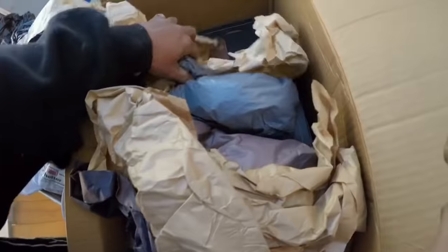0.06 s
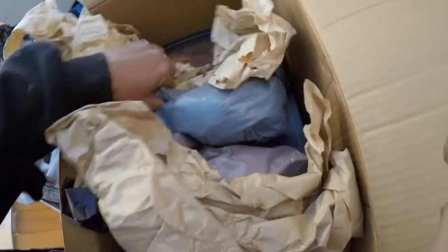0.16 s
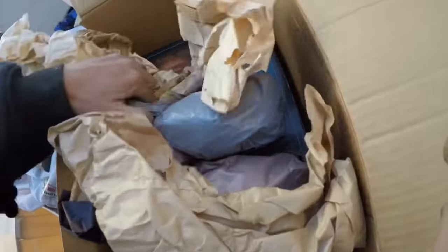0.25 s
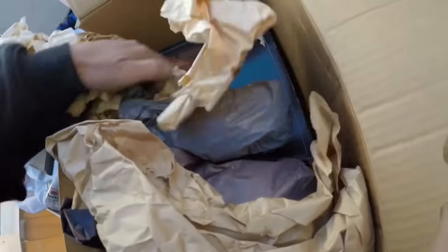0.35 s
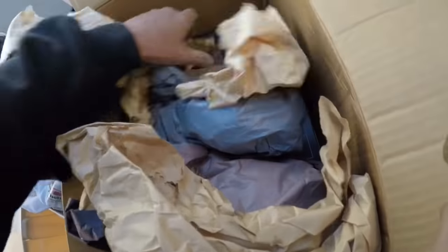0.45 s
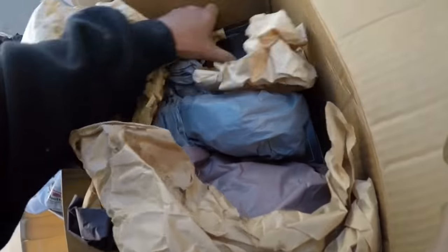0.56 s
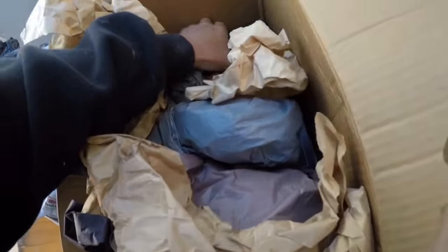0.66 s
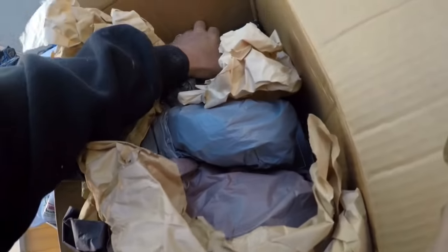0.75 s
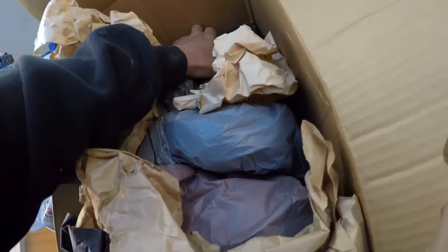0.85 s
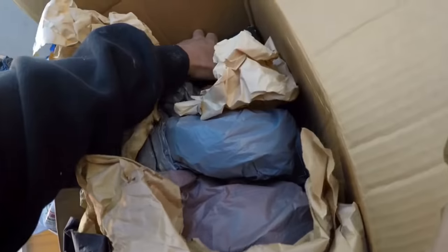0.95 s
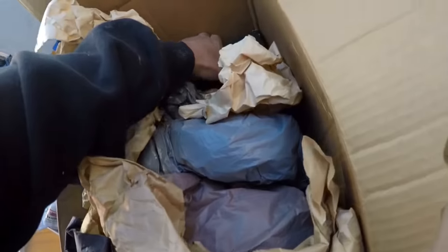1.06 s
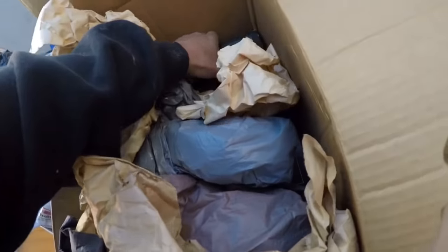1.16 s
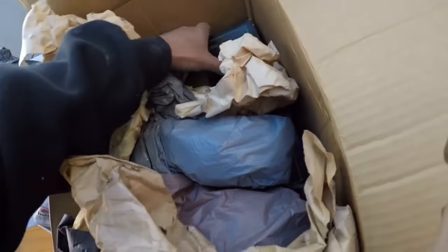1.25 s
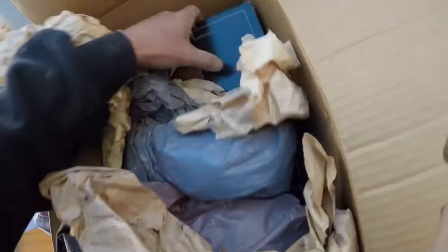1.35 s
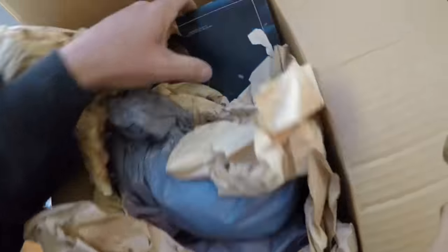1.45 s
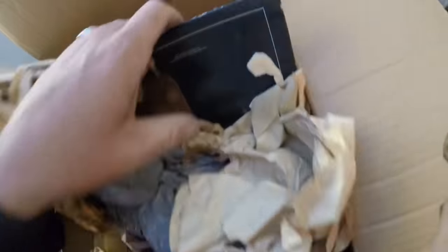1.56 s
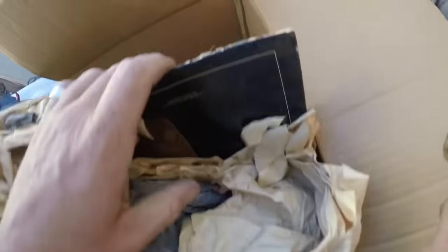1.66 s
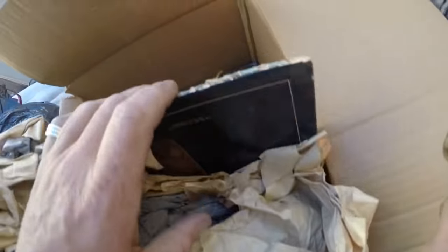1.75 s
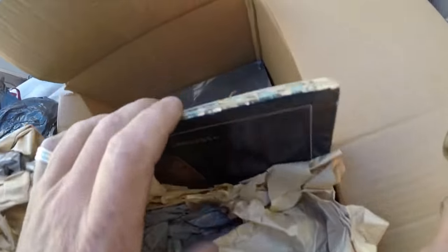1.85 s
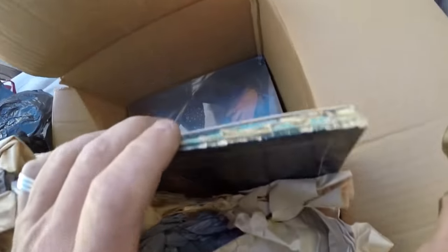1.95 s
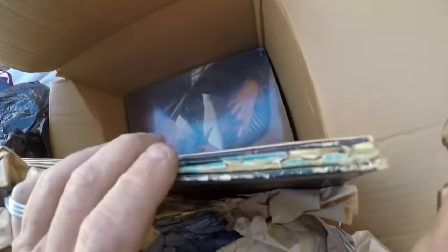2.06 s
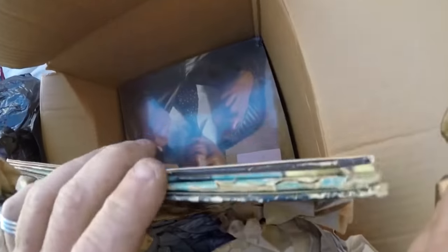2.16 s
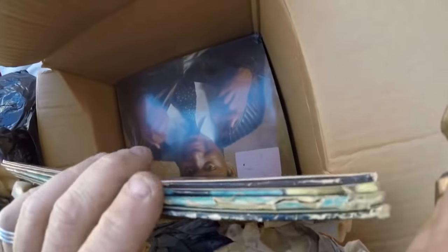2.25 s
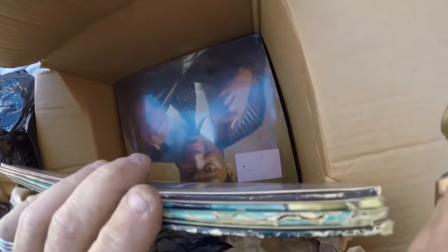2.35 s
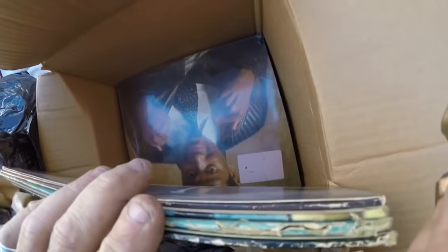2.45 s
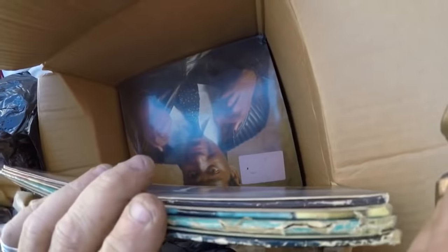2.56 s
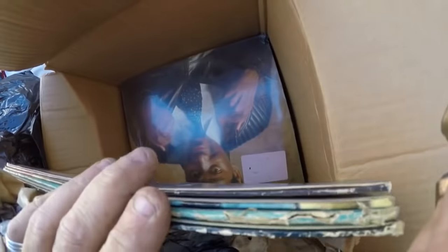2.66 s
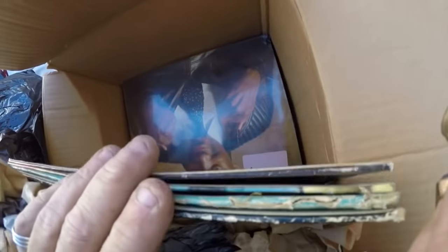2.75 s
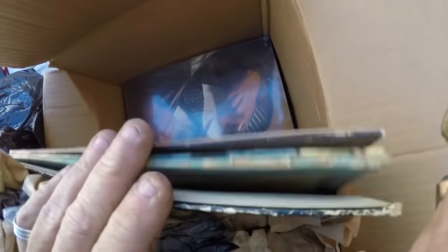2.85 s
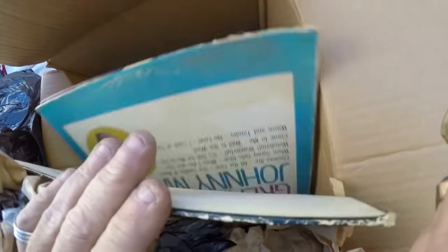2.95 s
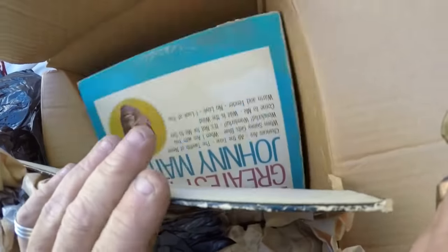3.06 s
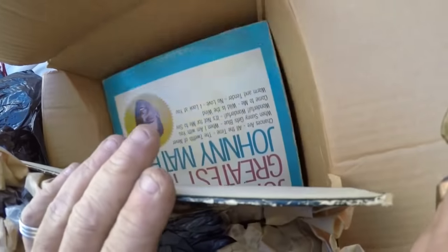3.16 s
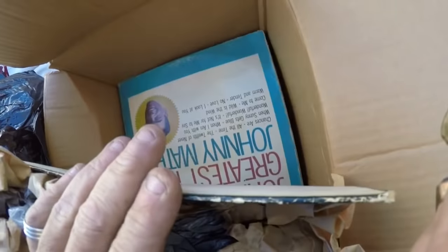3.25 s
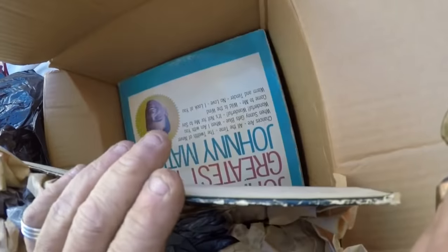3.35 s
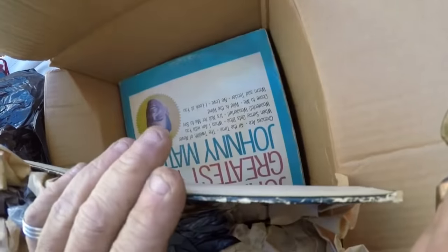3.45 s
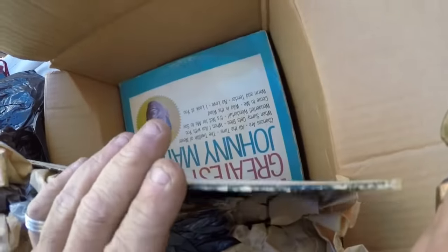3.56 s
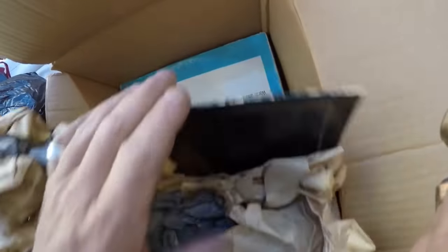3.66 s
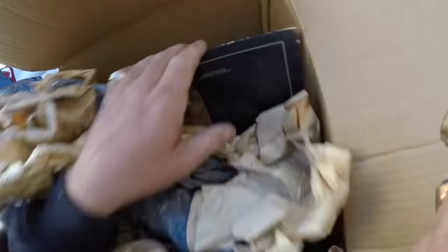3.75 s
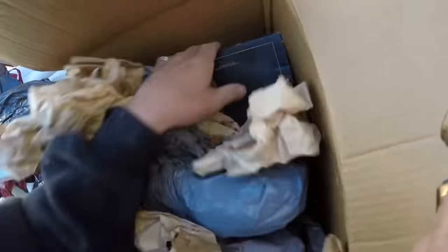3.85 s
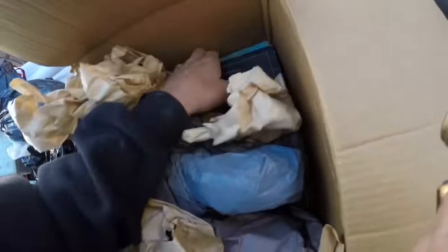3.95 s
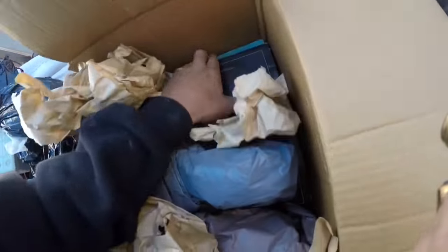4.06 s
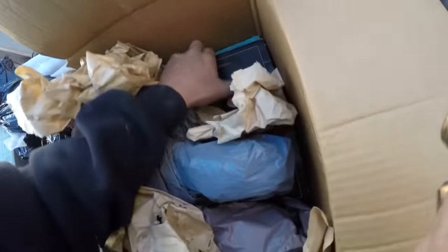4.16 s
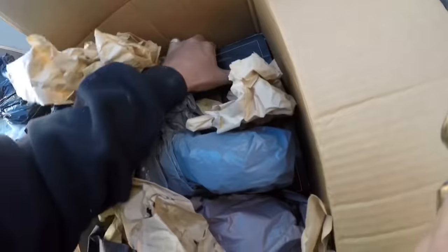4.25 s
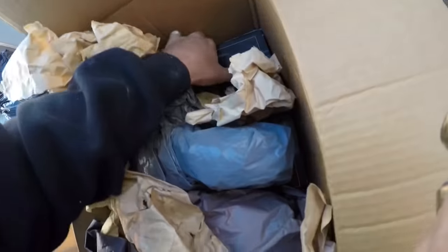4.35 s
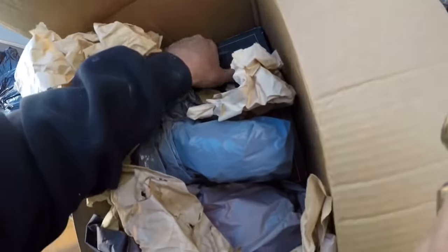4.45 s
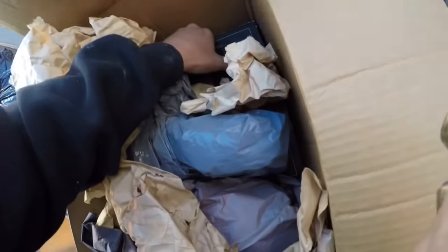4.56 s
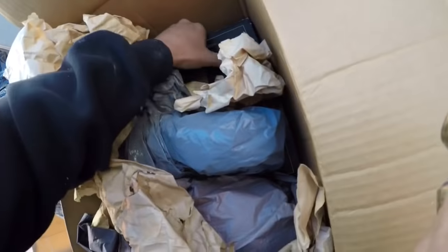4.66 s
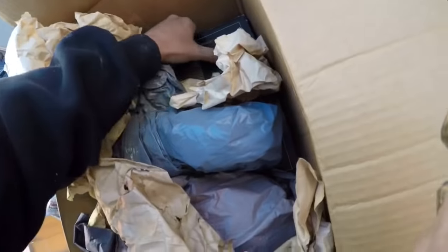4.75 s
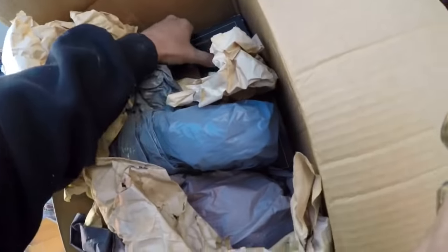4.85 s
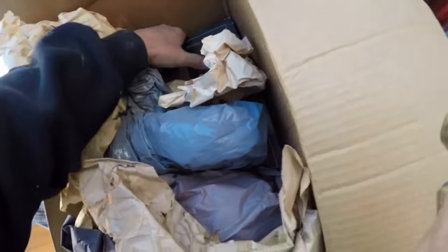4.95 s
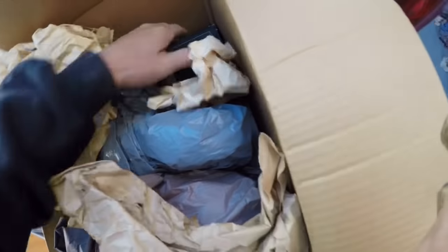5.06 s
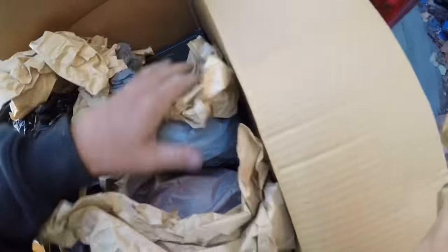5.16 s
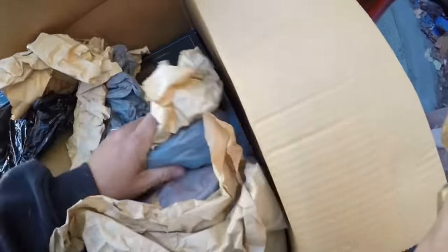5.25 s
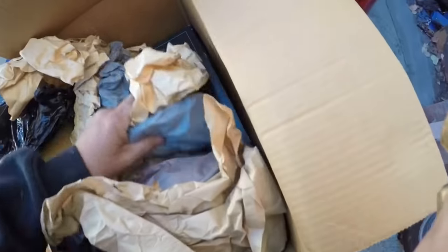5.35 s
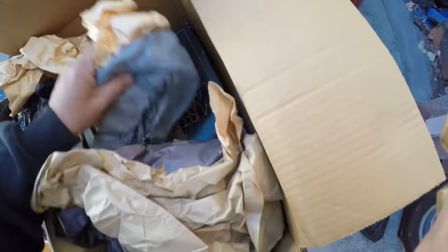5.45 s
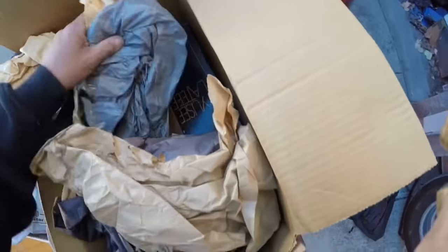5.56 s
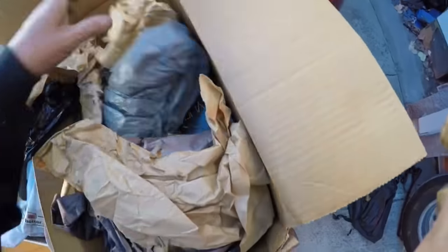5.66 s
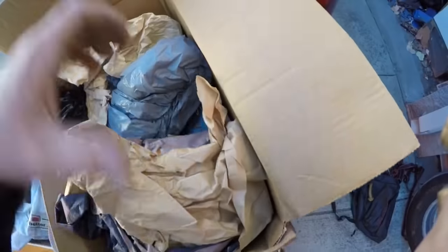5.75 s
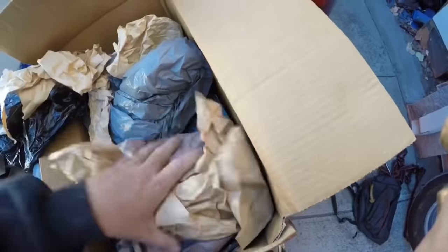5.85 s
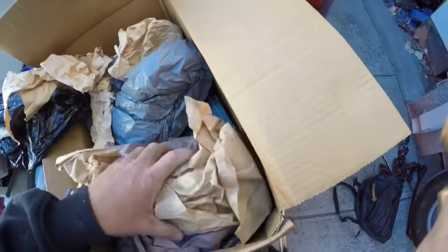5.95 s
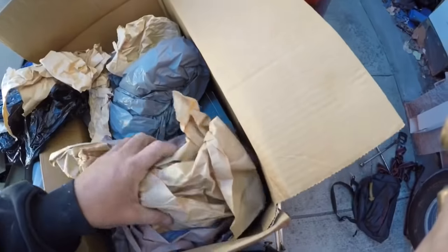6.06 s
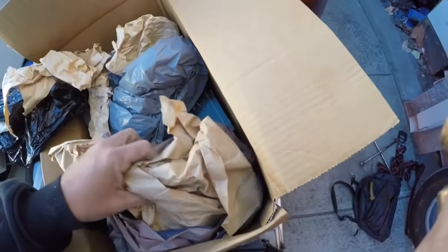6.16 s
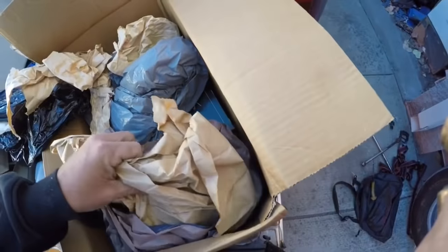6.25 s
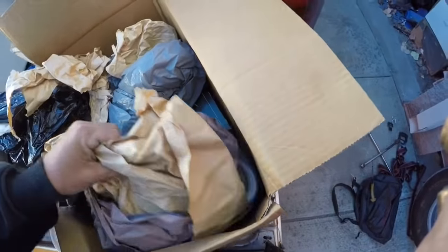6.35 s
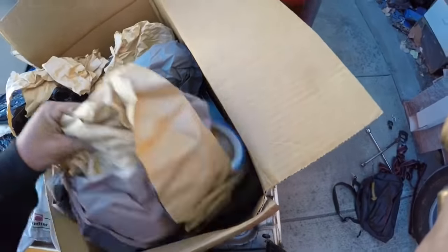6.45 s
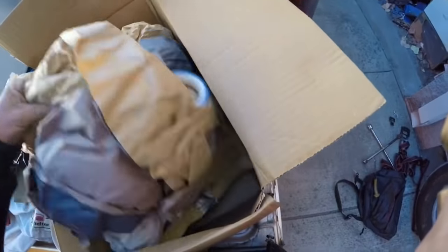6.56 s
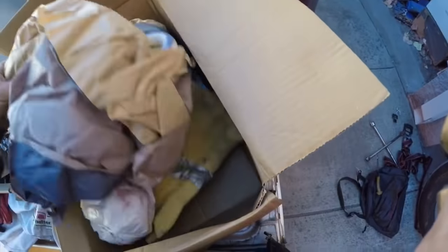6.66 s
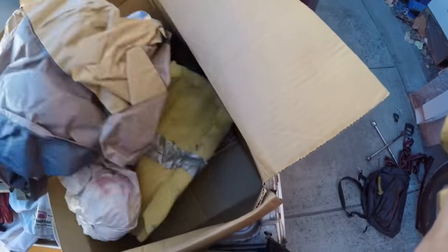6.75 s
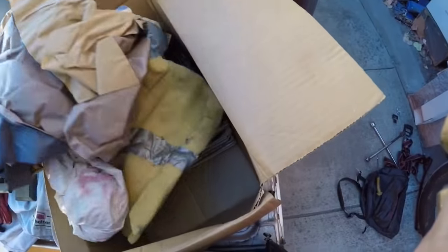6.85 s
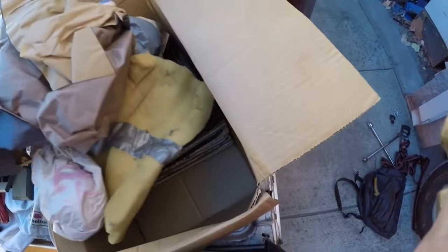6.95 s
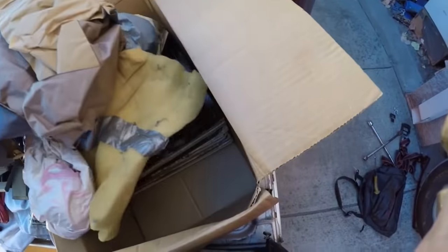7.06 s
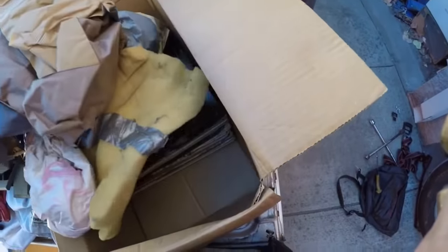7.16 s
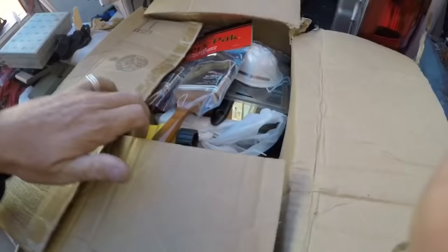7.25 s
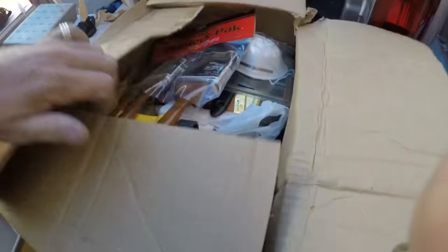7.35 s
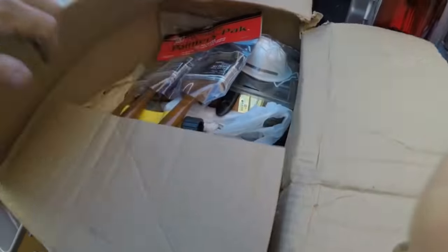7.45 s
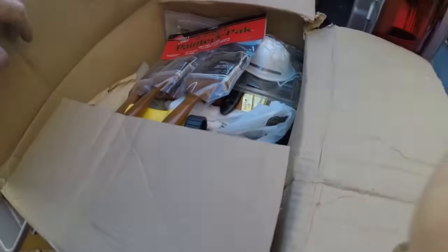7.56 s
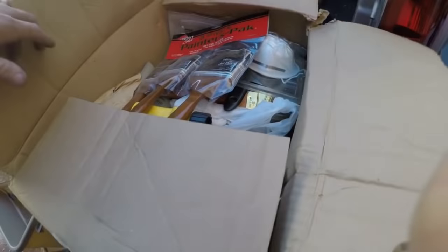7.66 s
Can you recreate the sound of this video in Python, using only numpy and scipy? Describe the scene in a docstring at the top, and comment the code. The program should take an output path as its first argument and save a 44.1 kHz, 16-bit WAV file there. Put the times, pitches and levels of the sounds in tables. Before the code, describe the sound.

Crisp packing-paper crackle over boomy cardboard bumps and low handling rumble, very near and nearly dry. Rustling comes in bursts with lulls between; sleeves slide with a short rough chatter near three seconds, and bundles groan along the box wall. Paper is grabbed and crushed near six seconds, a heavy bundle shifts, the sound briefly cuts out, and dry flap knocks finish over faint garage air.

```python
"""In a garage, hands rummage in a big cardboard box, close to a body-worn camera.
Packing paper and plastic bags crinkle as noise grains excited by random creases, with sharp ticks on top.
Bumps ring the damped modes of the box; bundles and sliding record sleeves groan and judder by stick-slip.
Stiff flaps are knocked, most often after a brief break near the end. Filtered noise gives the
handling rumble and the still air, and a decaying noise tail the faint reflections."""
import sys
import numpy as np
from scipy import signal
from scipy.fft import rfft, irfft, next_fast_len
from scipy.io import wavfile
from scipy.ndimage import uniform_filter1d

SR = 44100
rng = np.random.default_rng(int(sys.argv[2]) if len(sys.argv) > 2 else 0)


def inscribe(sig):
    """Save sig as 16-bit PCM at rate SR to the path in sys.argv[1].

    A 1-D sig is mono; a 2-D sig holds one channel per row.
    Samples are clipped to [-1, 1] before scaling.
    """
    pcm = np.round(np.clip(np.atleast_2d(sig).T, -1, 1) * 32767)
    wavfile.write(sys.argv[1], SR, pcm.astype(np.int16))


N = 339562
T = np.arange(N) / SR

# Levels in the event tables are relative: a common gain may follow for each source.
# handfuls of paper, plastic or sleeves being moved:
# [middle t/s, level/dB, 20 dB rise t/s, 20 dB fall t/s, extra hollow body level/dB, extra sheen level/dB]
HANDFULS = [(0.01, -25.5, .1, 0.23, 0, 2), (0.164, -27, 0.16, 0.29, -0.5, 4),
            (0.52, -29, 0.22, 0.38, 1.5, 2.5), (0.84, -46, 0.04, 0.21, 7.5, 3),
            (1.1, -40.5, 0.3, 0.081, 2.5, -1), (1.39, -37, .17, 0.22, 8, -13),
            (1.55, -24, 0.34, 0.2, -1.5, 4), (1.92, -35.5, 0.67, 0.46, 5, 2),
            (2.45, -48.5, 0.35, 0.4, 3, 3), (2.762, -49, 0.32, 0.24, 7.5, -2),
            (2.989, -30.5, .13, 0.12, 2.5, 4), (3.083, -29, 0.065, 0.18, 0, 3.5),
            (3.243, -34.5, .045, 0.02, 4, 4), (3.728, -31.5, 0.16, 0.11, 2.5, 3.5),
            (3.86, -27, 0.19, 0.29, -.5, 2.5), (3.95, -32, 0.091, 0.083, 2.5, 5),
            (4.212, -38, 0.21, 0.12, 3, 2), (4.355, -38.5, 0.11, 0.17, 3, 2),
            (4.555, -39, 0.19, 0.097, 1, 2), (4.7, -40, 0.13, 0.12, 3.5, 2.5),
            (4.775, -43.5, 0.098, 0.066, 0, 0), (5.025, -35, 0.16, 1, 2, 3.5),
            (5.22, -31, 0.037, 0.024, 8.5, 8), (5.285, -27.5, 0.18, 0.19, -0.5, 6.5),
            (5.48, -32.5, .17, 0.32, 0, -3), (5.64, -33.5, 0.56, 0.19, -1.5, 7),
            (5.907, -23, 0.032, 0.013, 3, 1.5), (5.99, -27.5, 0.072, .04, .5, 1.5),
            (6.08, -27, 0.093, 0.18, -1, 3), (6.2, -23.5, .14, .16, -1.5, 1.5),
            (6.343, -29, 0.04, 0.04, -1.5, 1), (6.53, -35.5, 1, 0.79, 4, 3.5),
            (7.035, -39, 0.41, 0.13, 3.5, -1.5), (7.3, -45.5, 0.16, 0.29, 2, -8.5),
            (7.462, -32, 0.15, .16, .5, 7), (7.55, -31.5, 0.11, 0.07, 2, -1), (7.7, -40.5, .17, .1, 7, 6)]
HOLD_S = 0.038
# spectral density of paper rustle: [f/Hz, level/dB]
PAPER_COLOUR = [(400, -3), (650, 2.5), (1100, 2.5), (1800, 1.5), (2600, 4), (3600, 3), (5000, -1),
                (7000, -8.5), (10000, -14), (15500, -22)]
# single loud creases: [t/s, level/dB, resonance f/Hz]
CREASE_SNAPS = [(0.033, -12, 2820), (0.1575, -14, 3150), (0.191, -18, 1880), (0.5474, -18.5, 2900),
                (0.8304, -22, 1560), (0.8454, -30, 3380), (1.013, -30.5, 5500), (1.1618, -34.5, 7000),
                (1.201, -29.5, 7570), (1.564, -17.5, 3640), (1.6752, -16.5, 3970), (2.1188, -31, 2280),
                (2.1418, -30, 3610), (2.2846, -23, 3280), (2.4894, -36, 1650), (2.651, -31, 2080),
                (3.1587, -18.5, 3370), (3.249, -21.5, 1950), (3.287, -27.5, 2380), (3.327, -33, 2290),
                (3.469, -36, 1810), (3.7301, -9, 3800), (3.8718, -13, 2610), (3.981, -12.5, 2520),
                (4.0446, -18, 3980), (4.4039, -12, 2970), (4.6965, -20, 5000), (4.82, -19, 4440),
                (4.9185, -31, 3760), (5.0637, -18.5, 1610), (5.1994, -12, 4440), (5.3412, -16.5, 4200),
                (5.46, -15.5, 2920), (5.783, -24, 2700), (5.8494, -28, 4470), (5.8774, -12.5, 4000),
                (5.896, -4.5, 3900), (5.9105, -10, 3500), (5.9647, -19, 4630), (6.006, -10.5, 3230),
                (6.0493, -11, 3300), (6.099, -10.5, 3850), (6.2023, -9, 4530), (6.432, -17.5, 2580),
                (6.6373, -22, 3900), (6.8688, -20.5, 1740), (7.057, -13.5, 4300), (7.5645, -9, 2290)]
SNAP_T60_S, SNAP_SWELL = 0.027, 0.36  # decay scale of a snap; swell time as a share of the decay
SNAP_LEAD_S = 0.012  # room for the swell ahead of the tick

# blows on the box wall: [t/s, peak level/dB, contact t/ms]
THUMPS = [(0.02, -12.5, 6.3), (0.553, -1.5, 2.25), (0.565, -7.5, 6.4), (0.596, -7, 4), (0.863, -27.5, 0.73),
          (1.067, -18, 15), (1.202, -24.5, 1.1), (1.29, -19, 16), (1.42, -18, 14), (1.507, -17, 3.4),
          (2.938, -11, 7.4), (3.004, -6, 2.6), (3.3, -22, 8.3), (3.65, -12, 5.3), (3.677, -15, 5.6),
          (3.694, -8, 4.2), (3.731, -10.5, 4.8), (3.796, -12, 3.9), (3.893, -5.5, 4.7), (3.945, -12, 12),
          (4.193, -5, 6.7), (4.363, -17, 1.5), (4.405, -2, 1.8), (4.418, -12, 2.3), (4.576, -19, 10),
          (4.657, -22.5, 0.64), (5.019, -13.5, 4.7), (5.695, -15.5, 4.5), (5.76, -17, 4.7),
          (6.143, -13, 13), (6.223, -11.5, 7.6), (6.291, -13, 9), (6.381, -16, 7.1), (6.429, -13, 3.9),
          (6.478, -4.5, 3.4), (6.647, -8.5, 22), (6.78, -8.5, 10.7), (6.804, -15.5, 2.9),
          (6.864, -9.5, 3.8), (6.949, -20, 1.1), (7.014, -9, 8.6), (7.05, -16, 2.7), (7.111, -13, 4.2),
          (7.288, -14.5, 4.4), (7.433, -9.5, 3.3), (7.453, -14, 3.8), (7.469, -10, 3.8), (7.529, -15, 3.1),
          (7.571, -9, 4.6)]
# modes of the loaded box: [f/Hz, level/dB, t60/s]
BOX_MODES = [(43.2, 0.5, 0.22), (64.6, 2, 0.22), (94, -5.5, 0.12), (122, 2, 0.06), (162, 1.5, 0.031),
             (210, -5.5, 0.034), (250.5, -7, 0.17), (321, -3, 0.049), (350, -45, 0.02), (450, -21, .06)]
# heavy things press longer: the lowest modes gain with each doubling of the contact time
HEAVE_CONTACT_MS, HEAVE_DB_PER_OCTAVE = 4.9, 13
# knocks on stiff cardboard: [t/s, peak level/dB, crack level re ring/dB, f/Hz favoured by the spot]
KNOCKS = [(0.831, -23, -3, 1700), (1.6757, -12.5, -19, 1560), (1.897, -21, -8, 800),
          (4.406, -12, -16, 1390), (7.058, -13.5, 1, 1130), (7.3941, -11.5, -14, 1010),
          (7.3961, -11, 4, 1290), (7.428, -2.5, -4, 1410), (7.446, -7.5, -1, 1510), (7.51, -12, -2, 1150),
          (7.5656, -6, 9.5, 2200), (7.570, -7.5, -14, 663), (7.611, -16.5, -12, 696)]
# modes of a flap: [f/Hz, level/dB, t60/s]
FLAP_MODES = [(285.5, 16, 0.1), (465, -11, 0.049), (569, 4.5, 0.06), (810, 4, 0.031), (1000, -18, 0.035),
              (1072, 8, 0.036), (1240, 3.5, 0.013), (1760, 9.5, 0.0082), (1920, -27, 0.018),
              (2310, -3, 0.039), (2650, 19, 0.012)]

# bundles pushed hard along the box wall: [peak t/s, level/dB, 20 dB rise and fall t/s]
DRAGS = [(0.568, -17, 0.057), (0.74, -30.5, 0.17), (1.495, -26.5, 0.071), (3.0, -20.5, 0.11),
         (3.89, -20.5, 0.12), (4.22, -34, 0.048), (4.68, -35, 0.046), (5.23, -28.5, 0.067),
         (5.469, -28, 0.03), (5.901, -21, 0.035), (6.48, -25, 0.12), (7.44, -22, 0.076), (7.57, -28.5, 0.1)]
# resonances of one cardboard wall: [f/Hz, width f/Hz, level/dB]
WALL_RESONANCES = [(225, 42, 2), (284, 77, 5), (373, 130, 1.5), (474, 25, -15), (606, 210, -7)]
# any handling also brushes the wall: level at full effort, and dB gained per dB of paper
BRUSH_DB, BRUSH_SLOPE = -34.5, 0.57
# sleeves judder down the wall: [t/s, nominal slip rate f/Hz, level/dB]
JUDDER = [(0.66, 100, -54), (0.70, 105, -31), (0.735, 122, -34), (0.77, 108, -39), (0.84, 113, -42),
          (0.868, 98, -32), (0.92, 117, -61), (1.44, 103, -55), (1.49, 125, -30), (1.54, 85, -66),
          (2.88, 90, -59), (2.93, 90, -46), (2.965, 105, -25.5), (2.985, 103, -17.5), (3.008, 106, -16.5),
          (3.025, 83, -24), (3.05, 80, -47)]
# resonances of a sleeve: [f/Hz, width f/Hz, level/dB]
SLEEVE_RESONANCES = [(306, 17, 10.5), (472, 28, -10.5), (614, 13, -1), (732, 22, -11)]

# slow sway of the load and the camera, which never quite rest: [t/s, level/dB]
SWAY = [(0.0, -21), (1.05, -54), (1.26, -28.5), (2.81, -35), (3.88, -22.5), (4.05, -37.5), (5.15, -34),
        (6.91, -23.5), (7.2, -28), (7.7, -22)]
FLUTTER_DB, FLUTTER_SLOPE = -39.5, 0.31  # walls at full effort, and dB gained per dB of paper
# each blow shakes the box: levels re the blow, and times to change by 20 dB
SHAKE_SWAY_DB, SHAKE_FLUTTER_DB, SHAKE_DRAG_DB = -11.5, -19, -33
SHAKE_RISE_S, SHAKE_FALL_S = 0.026, 0.082
# relative spectrum of the garage air: [f/Hz, level/dB]
GARAGE_SPECTRUM = [(15, -33), (25, 0), (67, -8.5), (125, -29.5), (213, -24), (286, -37), (637, -33),
                   (952, -37.5), (1810, -38.5), (15000, -103)]
GARAGE_DB = -35.5  # rms
# silent break: [start t/s, end t/s]
BREAK_S = (7.326, 7.334)
TOP_HZ = 15500


def handling():
    """Superposition of powers: overlapping handfuls set the rustle's level, hollow body and sheen, in dB."""
    power = np.array([swell(s, db, rise_s, fall_s, HOLD_S) for s, db, rise_s, fall_s, _, _ in HANDFULS])
    total = power.sum(axis=0)
    extra_power = undb(np.transpose(HANDFULS)[-2:]) ** 2
    body, sheen = extra_power @ power / total  # averages weighted by power
    return smooth_db(total), smooth_db(body), smooth_db(sheen)


def paper(level_db, body_db, sheen_db, creases_per_s, spread_db, tint_db, crease_s, rub_db, echo_s, echo_db):
    """Random impulse excitation: countless creases buckle, few big and most tiny, over rubbing hiss."""
    # slow movement buckles fewer creases, so they stand out as single ticks
    rate = creases_per_s * undb(0.49 * (level_db - level_db.max()))
    bunching = runs(per_s=90, depth_db=6)
    at = np.flatnonzero(rng.random(N) < rate * bunching / SR)
    size_db = spread_db * np.minimum(rng.exponential(size=N)[at], 3.6)
    edges = np.geomspace(450, 16000, 12)
    rustle = 0
    for lo, hi in zip(edges, edges[1:]):
        hz = np.sqrt(lo * hi)
        kicks = np.zeros(N)
        tints = rng.standard_normal(size=8191)
        tinted_db = size_db + tint_db * tints[at % len(tints)]  # creases differ in colour
        kicks[at] = undb(tinted_db) ** 2
        # each tick scatters briefly inside the box; rubbing fills the gaps, least in the treble
        energy = linger(kicks, crease_s) + undb(echo_db) ** 2 * linger(kicks, echo_s)
        rubbing = undb(rub_db - 0.13 * np.log2(hz / 3000)) ** 2 * rate / rate.mean()
        grains = np.sqrt(energy / energy.mean() + rubbing) * rng.standard_normal(N)
        # big loose folds sound hollow, small tight ones and plastic glitter
        body = np.interp(hz, [1300, 2200], [1, 0]) * body_db
        sheen = np.interp(hz, [4800, 8500], [0, 1]) * sheen_db
        density_db = level_db + colour_db(PAPER_COLOUR, hz) + body + sheen
        even_grains = steady(band(grains, lo, hi, order=3), 0.34)
        rustle = rustle + even_grains * undb(density_db) * np.sqrt((hi - lo) / 4200)
    return rustle


def snap(hz, t60, width, crack_db, tail_db):
    """Resonance under a burst: noise swells very briefly into a sharp tick, then rings briefly."""
    t = np.arange(SR // 16) / SR - SNAP_LEAD_S
    away = np.maximum(t, -t / SNAP_SWELL)
    envelope = fade(away, t60 / 3) + undb(tail_db) * fade(away, 2 * t60)
    burst = rng.standard_normal(len(t)) * envelope
    facet = resonate(burst, hz, width * hz) + undb(crack_db) * burst
    return band(facet, 700, max(8500, 2.2 * hz))


def snaps(gain_db, width, crack_db, tail_db):
    """Resonant response to noise bursts: the loudest creases, one by one, scaled by their energy."""
    out = np.zeros(N)
    for s, db, hz in CREASE_SNAPS:
        tick = snap(hz, SNAP_T60_S, width, crack_db, tail_db)
        crest = 2.4 * np.sqrt(np.sum(tick ** 2) / (.004 * SR))  # nominal peak for this energy
        add(out, s + .001 - SNAP_LEAD_S, tick / crest * undb(db + gain_db))
    return out


def small_ticks(effort_db, tick_db, slope, spread_db):
    """Uniformly random events: paper and plastic tick throughout, fainter while the hands rest."""
    out, count = np.zeros(N), 230
    for when, size, pitch in rng.random((count, 3)):
        i = int(when * (N - 1))
        tick = snap(2200 * 4 ** pitch, t60=.012, width=.7, crack_db=-8, tail_db=-18)
        level_db = tick_db + slope * effort_db[i] + spread_db * size ** 2
        add(out, i / SR - SNAP_LEAD_S, peak(tick, level_db))
    return out


def thumps(gain_db):
    """Impact excitation of damped modes: sleeves bump the box; a longer push favours its lowest modes."""
    out, t = np.zeros(N), np.arange(SR // 3) / SR
    for s, db, contact_ms in THUMPS:
        heave_db = HEAVE_DB_PER_OCTAVE * np.log2(contact_ms / HEAVE_CONTACT_MS)
        push = t * np.exp(-t / (contact_ms / 1000 / 4))  # time constant: a quarter of the contact
        # light things shake the wall alone, heavy ones heave the whole load
        modes = [(hz, level + heave_db * np.interp(hz, [70, 170], [1, 0]), t60)
                 for hz, level, t60 in BOX_MODES]
        blow = signal.fftconvolve(ring(modes, t, detune=0.042, scatter_db=2.5), push)[:len(t)]
        add(out, s, peak(band(blow, 26.0, 416), db + gain_db))
    return out


def knocks(crack_t60, gain_db, narrow_db):
    """Modal excitation by position: a struck flap gives a dry crack and the short ring of corrugated board."""
    out, t = np.zeros(N), np.arange(SR // 6) / SR
    for s, db, crack_db, pitch_hz in KNOCKS:
        crack = band(rng.standard_normal(len(t)) * fade(t, crack_t60), 1200, 5900, order=1)
        # modes weaken with every octave away from the struck spot's own pitch
        modes = [(hz, level - narrow_db * abs(np.log2(hz / pitch_hz)), t60)
                 for hz, level, t60 in FLAP_MODES]
        board = band(ring(modes, t, detune=.012, scatter_db=1.5), 250, 3200)
        knock = band(peak(board, 0) + peak(crack, crack_db), 230, 5900)
        add(out, s, peak(knock, db + gain_db))
    return out


def shaking():
    """Superposition of transient responses: how hard the box shakes around the blows, in dB."""
    return smooth_db(sum(swell(s, db, SHAKE_RISE_S, SHAKE_FALL_S) for s, db, _ in THUMPS))


def drag(effort_db, shake_db, slips_per_s):
    """Stick-slip friction: bundles make the wall groan under pushes, at blows and lightly with all handling."""
    push_db = smooth_db(sum(swell(s, db, length_s, length_s) for s, db, length_s in DRAGS))
    brush_db = BRUSH_DB + BRUSH_SLOPE * effort_db
    pressure = np.linalg.norm(undb([push_db, shake_db + SHAKE_DRAG_DB, brush_db]), axis=0)
    jerks = slips(slips_per_s, jitter=.9)
    wall = sum(undb(db) * resonate(jerks, hz, width) for hz, width, db in WALL_RESONANCES)
    return steady(band(wall, 193, 480), 0.082) * pressure


def judder():
    """Nearly periodic stick-slip: record sleeves chatter as they slide down into the box."""
    rate, level_db = curves(JUDDER)
    jerks = slips(rate, jitter=.15)
    # a lightly pressed sleeve sounds its upper resonances less
    light_db = np.minimum(level_db + 19, 0)
    board = sum(undb(db + light_db * (hz > 550)) * resonate(jerks, hz, width)
                for hz, width, db in SLEEVE_RESONANCES)
    active = (T > JUDDER[0][0]) * (T < JUDDER[-1][0])
    return steady(band(board, 330, 990, order=3), 0.021) * undb(level_db) * active


def jostle(effort_db, shake_db, sway_db):
    """Random low-frequency vibration: the load sways, the walls flutter above it; blows stir up both."""
    own_sway = undb(curves(SWAY)[0] + sway_db) * runs(per_s=13, depth_db=3)
    sway = np.hypot(own_sway, undb(shake_db + SHAKE_SWAY_DB))
    flutter = np.hypot(undb(FLUTTER_DB + FLUTTER_SLOPE * effort_db), undb(shake_db + SHAKE_FLUTTER_DB))
    slow = steady(band(rng.standard_normal(N), 30.3, 80.4), 0.042)
    quick = steady(band(rng.standard_normal(N), 79.5, 189.5, order=3), 0.076)
    return slow * sway + quick * flutter


def reflections(x, t60, wet_db):
    """Diffuse reverberation: a decaying noise response gives a faint tail from the cluttered garage."""
    t = np.arange(SR // 2) / SR
    tail = band(rng.standard_normal(len(t)), 334, 6500, order=1) * fade(t, t60) * (t > .008)
    return x + undb(wet_db) * signal.fftconvolve(x, tail / np.sqrt(np.sum(tail ** 2)))[:N]


def garage():
    """Stationary coloured noise: the still air of the garage."""
    size = next_fast_len(N)
    gain = undb(colour_db(GARAGE_SPECTRUM, np.fft.rfftfreq(size, 1 / SR)))
    air = irfft(rfft(rng.standard_normal(size)) * gain, size)[:N]
    return unit(air) * undb(GARAGE_DB)


def slips(rate, jitter):
    """Relaxation oscillation: an uneven train of small jerks."""
    wobble = np.repeat(rng.standard_normal(N // 128 + 1), 128)[:N]
    turns = np.floor(np.cumsum(rate * np.exp(jitter * wobble)) / SR)
    return np.diff(turns, prepend=0) * rng.rayleigh(size=N)


def ring(modes, t, detune, scatter_db):
    """Modal superposition: each contact shifts and weights the damped modes a little differently."""
    chance = rng.standard_normal((len(modes), 3))
    out = 0
    for (hz, db, t60), (weight, shift, phase) in zip(modes, chance):
        wave = np.cos(2 * np.pi * hz * (1 + detune * shift) * t + phase)
        out = out + undb(db + scatter_db * weight) * fade(t, t60) * wave
    return out


def runs(per_s, depth_db):
    """Random modulation: movements bunch in short runs; a gain of mean about 1."""
    size = int(SR / per_s)
    gain = undb(depth_db * np.repeat(rng.standard_normal(N // size + 1), size)[:N])
    return uniform_filter1d(gain / gain.mean(), size // 2)


def swell(s, db, rise_s, fall_s, hold_s=0):
    """Exponential growth and decay of power: up 20 dB in rise_s, a hold, down 20 dB in fall_s."""
    t = T[::64] - s  # a coarse time grid is enough
    away = np.maximum((-t - hold_s / 2) / rise_s, (t - hold_s / 2) / fall_s)
    return undb(db - 20 * np.clip(away, 0, 10)) ** 2


def smooth_db(power):
    """Logarithmic level: a coarse power envelope interpolated to every sample."""
    return np.interp(T, T[::64], 10 * np.log10(power))


def linger(energy, tau_s):
    """First-order relaxation: energy dies away exponentially, keeping its total."""
    keep = np.exp(-1 / (tau_s * SR))
    return signal.lfilter([1 - keep], [1, -keep], energy + 1e-9)


def fade(t, t60):
    """Exponential damping: amplitude falls by 60 dB in t60."""
    return np.exp(-np.log(1000) * t / t60)


def resonate(x, hz, width_hz):
    """Simple resonance: gain 1 at its centre."""
    return signal.lfilter(*signal.iirpeak(hz, hz / width_hz, fs=SR), x)


def band(x, lo_hz, hi_hz, order=2):
    """Band limitation by a causal filter."""
    return signal.sosfilt(signal.butter(order, [lo_hz, min(hi_hz, .48 * SR)], "band", fs=SR, output="sos"), x)


def colour_db(points, hz):
    """Spectral envelope: levels interpolated on a log-frequency axis."""
    f, db = np.transpose(points)
    return np.interp(np.log(hz + 1), np.log(f), db)


def steady(x, span_s):
    """Level equalisation: hold the rms near 1 over a span, keeping faster detail."""
    size = int(span_s * SR / 2) + 1
    power = uniform_filter1d(uniform_filter1d(x ** 2, size), size)
    return x / np.sqrt(np.abs(power) + 1e-12)


def curves(table):
    """Linear interpolation: table columns as sample-by-sample controls."""
    s, *columns = np.transpose(table)
    return [np.interp(T, s, c) for c in columns]


def undb(db):
    """Logarithmic level law: decibels to amplitude gain."""
    return np.exp(np.asarray(db) * (np.log(10) / 20))


def unit(x):
    """Effective value: scale to rms 1."""
    return x / np.sqrt(np.mean(x ** 2))


def peak(x, db):
    """Peak amplitude: scale to a level in dB."""
    return x * undb(db) / np.abs(x).max()


def add(out, s, x):
    """Linear superposition: mix a short sound in at a time."""
    i = max(int(s * SR), 0)
    out[i:i + len(x)] += x[:N - i]


def scene():
    """Common excitation: the effort of the hands, within arm's reach, drives paper and cardboard alike."""
    level_db, body_db, sheen_db = handling()
    effort_db, shake_db = level_db - level_db.max(), shaking()
    crinkle = undb(-2) * paper(level_db, body_db, sheen_db, creases_per_s=1000, spread_db=3.0, tint_db=4.0,
                               crease_s=0.0011, rub_db=-2.0, echo_s=0.011, echo_db=-3)
    creases = snaps(gain_db=.3, width=.38, crack_db=-15, tail_db=-18)
    ticks = small_ticks(effort_db, tick_db=-17.5, slope=1.0, spread_db=11)
    blows = thumps(gain_db=1.0) + knocks(crack_t60=0.023, gain_db=-0.5, narrow_db=14.5)
    friction = drag(effort_db, shake_db, slips_per_s=170) + judder()
    rumble = jostle(effort_db, shake_db, sway_db=-0.5)
    near = crinkle + creases + ticks + blows + friction + rumble
    return (reflections(near, t60=0.56, wet_db=-33.5) + garage())[None]


def record(dry):
    """Saturation and band limitation: the sound breaks off briefly; the camera rounds peaks and cuts the top."""
    running = uniform_filter1d(1. * ((T < BREAK_S[0]) | (T > BREAK_S[1])), size=64)
    rounded = running * dry / (1 + (dry / .95) ** 6) ** (1 / 6)
    return signal.sosfilt(signal.ellip(10, .1, 80, TOP_HZ, fs=SR, output="sos"), rounded)


dry = scene()
out = record(dry)
inscribe(out)
```